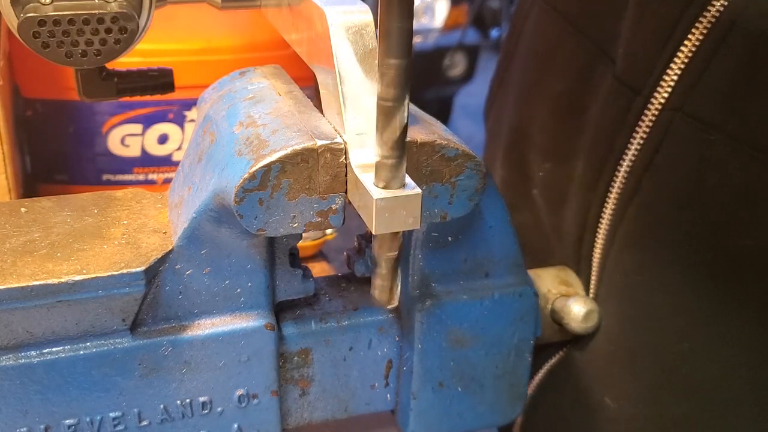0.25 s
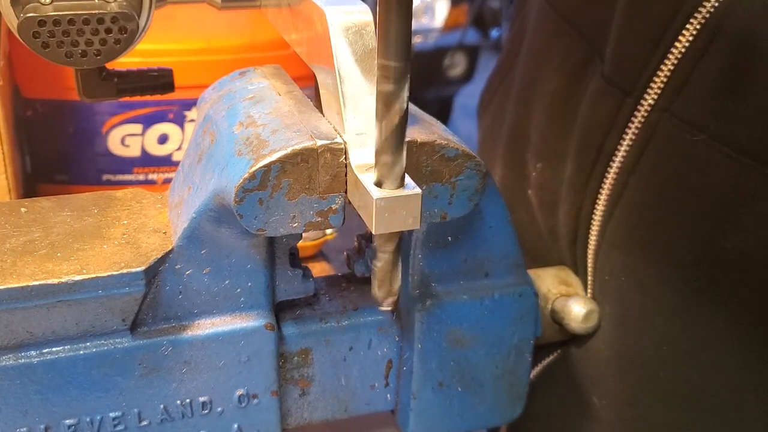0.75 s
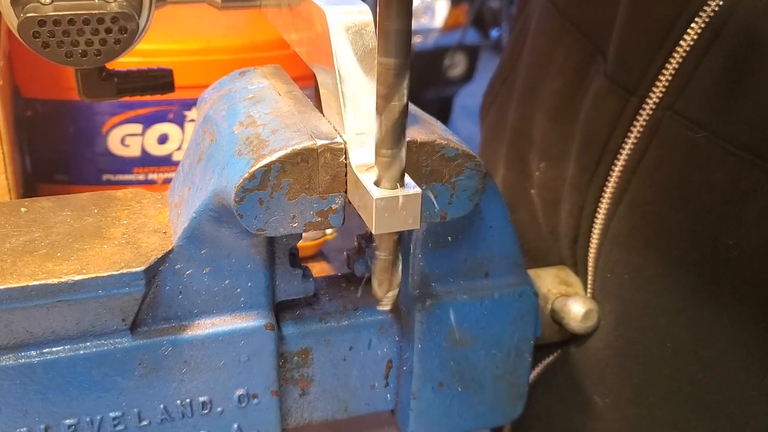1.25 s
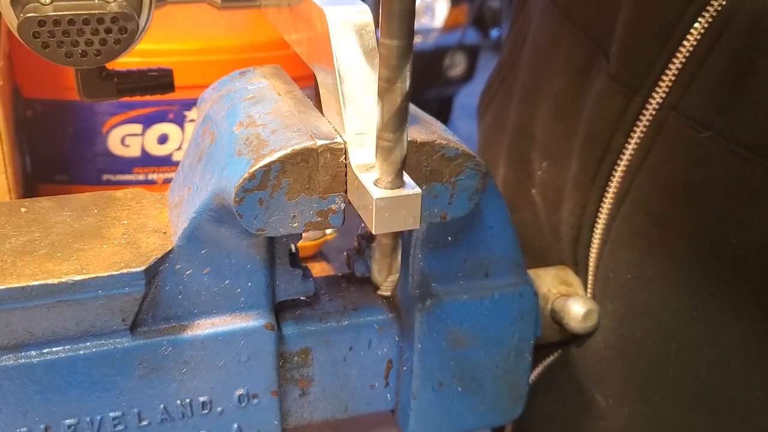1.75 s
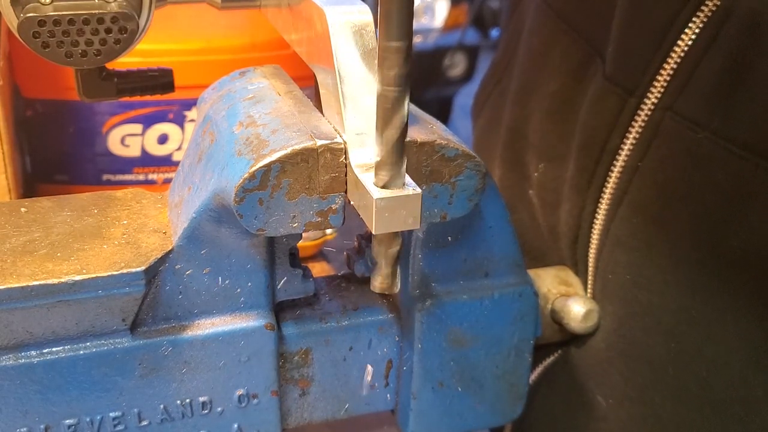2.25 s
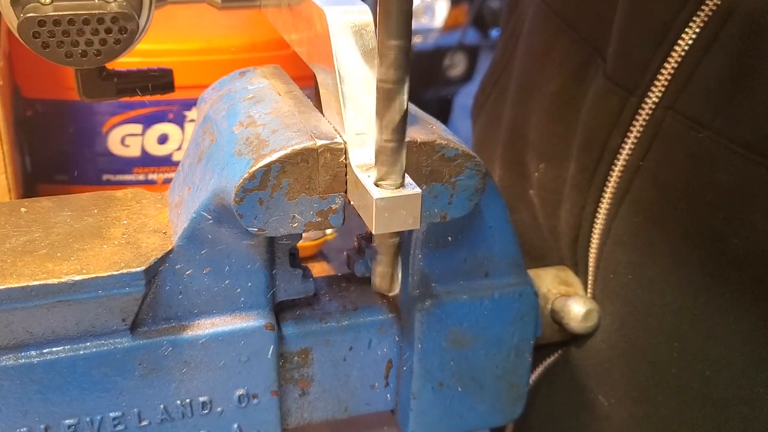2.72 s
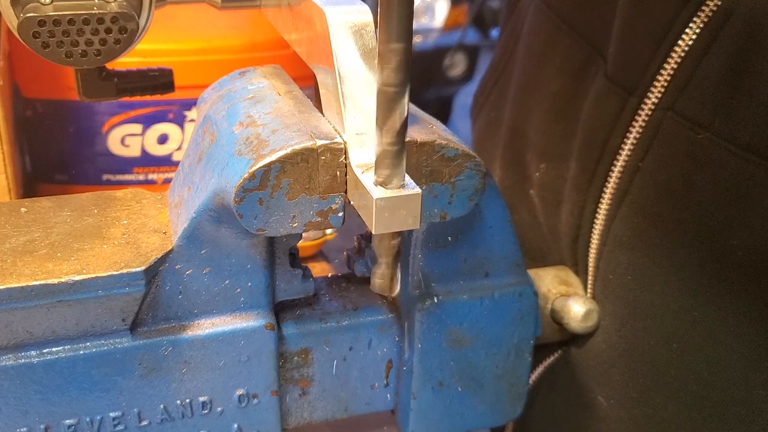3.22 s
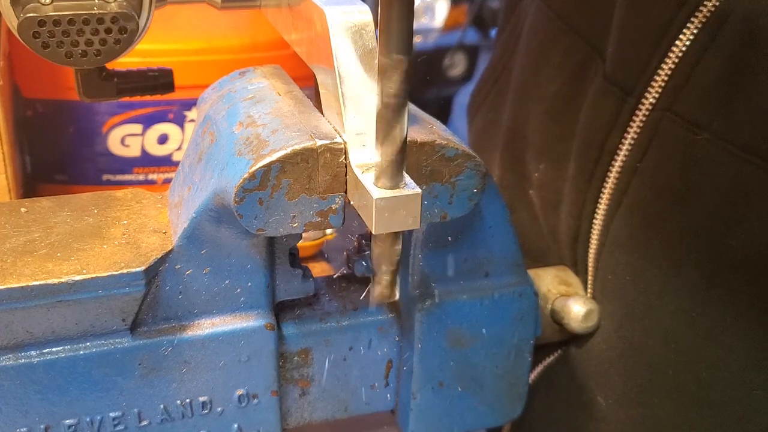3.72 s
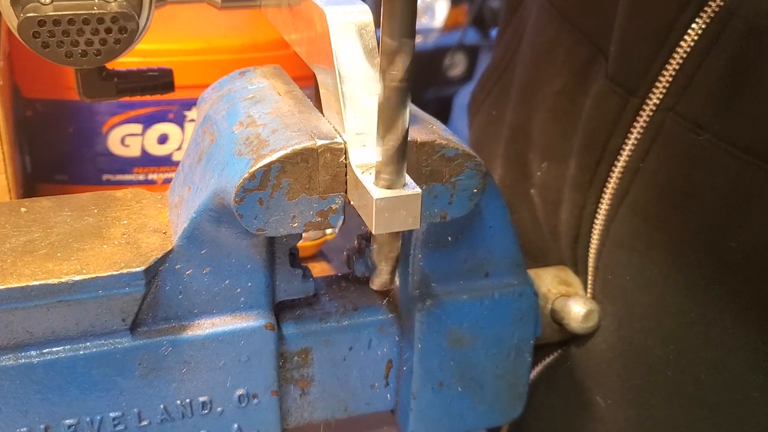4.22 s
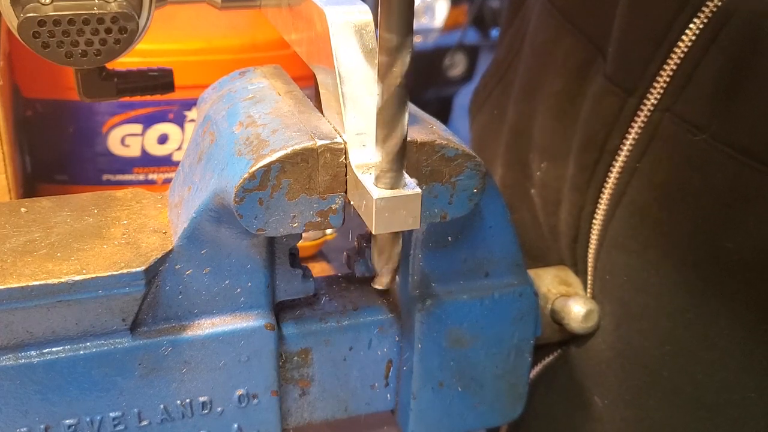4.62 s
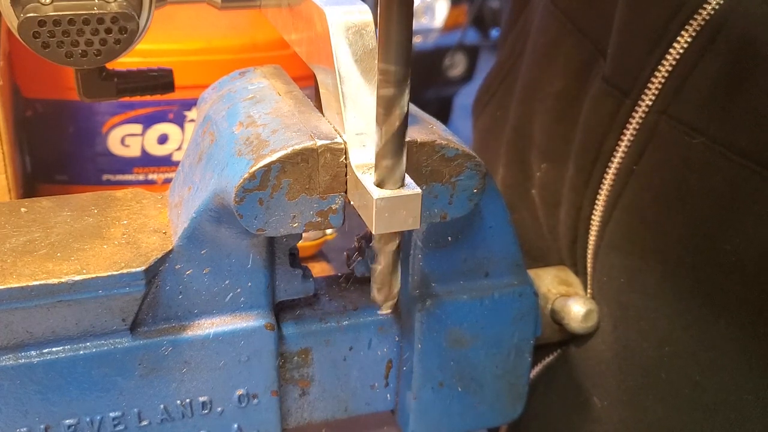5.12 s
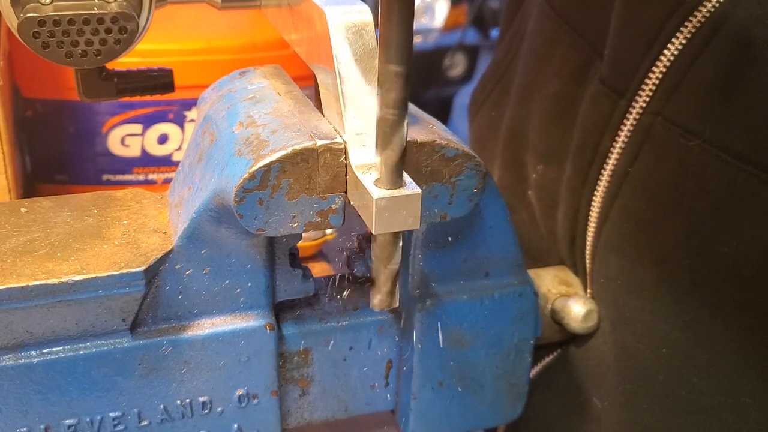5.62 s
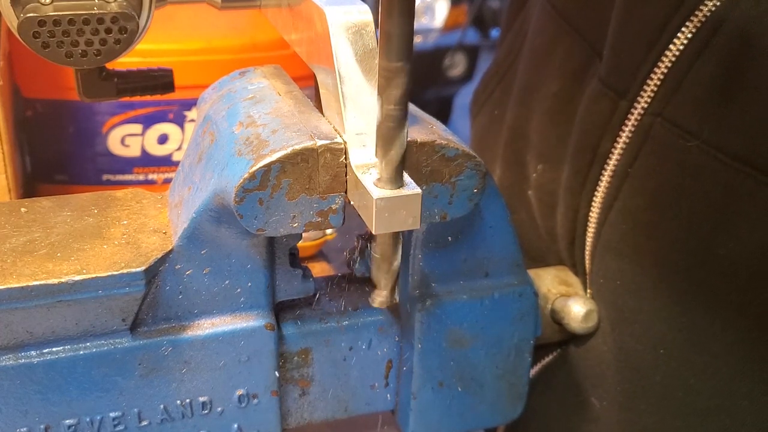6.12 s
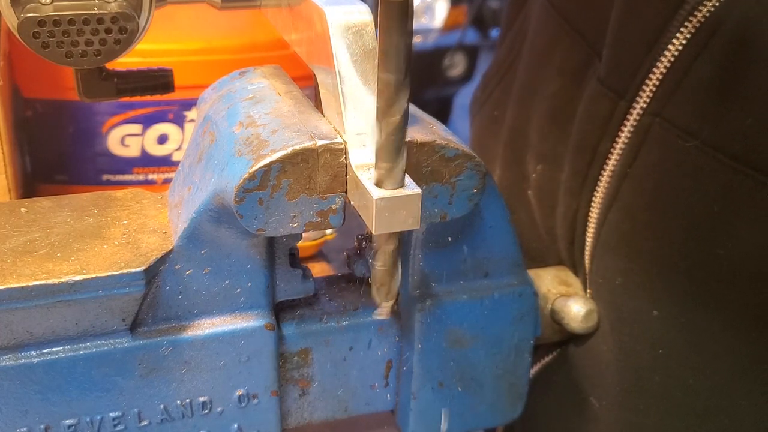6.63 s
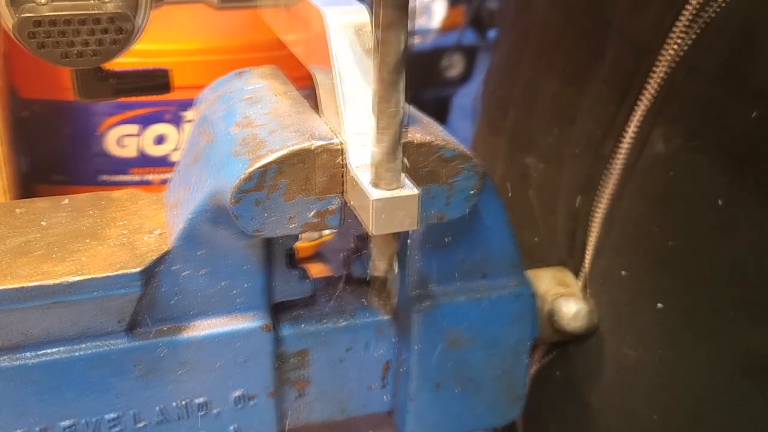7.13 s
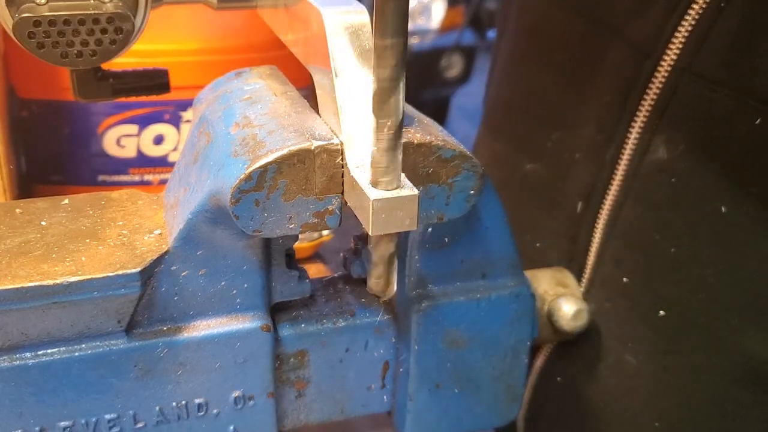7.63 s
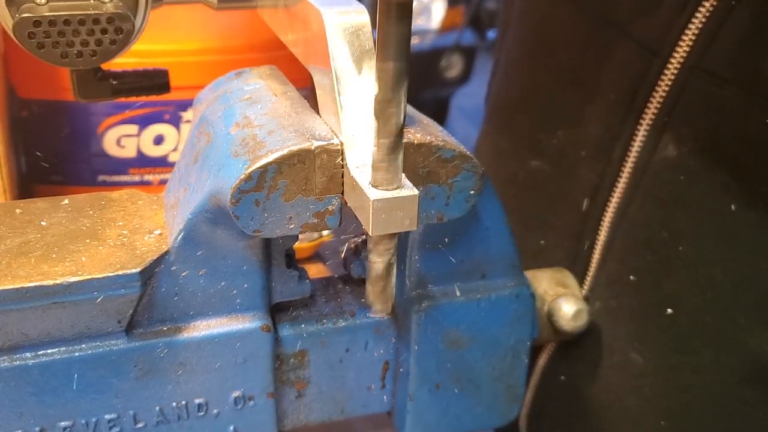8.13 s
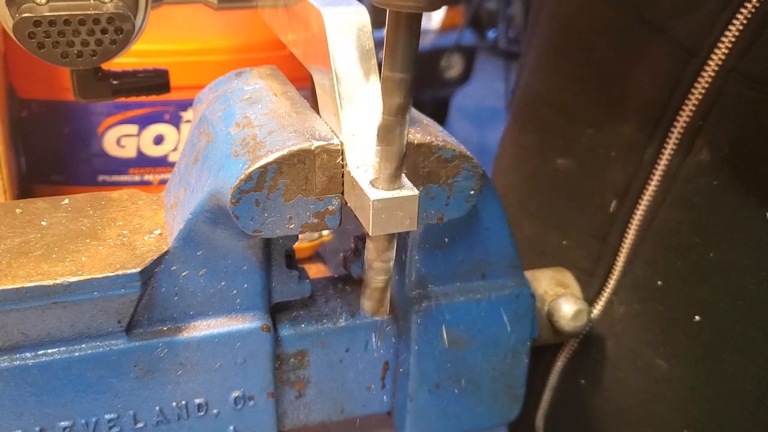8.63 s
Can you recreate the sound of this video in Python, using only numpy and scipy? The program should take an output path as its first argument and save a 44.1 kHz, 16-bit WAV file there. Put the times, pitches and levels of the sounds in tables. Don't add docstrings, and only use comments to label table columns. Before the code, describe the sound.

A power drill runs continuously, heard by a close stereo microphone pair with slight garage reflections. Its laboured whine dips as the bit grabs, with gritty hiss, bench thuds and short metallic judders. A piercing squeak makes the level drop, after which the motor spins faster and gradually regains loudness. More chatter and small squeaks follow before the tones give way to a cleaner, steady tooth whine over rumble.

```python
import sys
import numpy as np
from scipy import signal
from scipy.fft import irfft, next_fast_len
from scipy.io import wavfile
from scipy.ndimage import uniform_filter1d

SR = 44100
rng = np.random.default_rng(int(sys.argv[2]) if len(sys.argv) > 2 else 0)


def wav_out(sig):
    wavfile.write(sys.argv[1], SR, np.round(np.clip(np.atleast_2d(sig).T, -1, 1) * 32767).astype(np.int16))


def elevation(decibels):
    levels = np.asarray(decibels, float)
    return 10 ** (levels / 20)


N = 390726


def evened(x):
    return x / np.sqrt(np.mean(x ** 2) + 1e-20)


def read(hz, points, values):
    return np.interp(np.log(hz + 1), np.log(np.add(points, 1)), values)


def curve(rows, t):
    s, *columns = np.transpose(rows)
    return [np.interp(t, s, c) for c in columns]


def cusps(rows, t, point=1):
    s, reach, *columns = np.transpose(rows)
    return np.array(columns) @ np.exp(-(abs(t - s[:, None]) / reach[:, None]) ** point)


def slowly(rule):
    coarse = np.arange(0, N + 64, 64) / SR
    return lambda t: np.array([np.interp(t, coarse, row) for row in rule(coarse)])


def wander(size, count=N, db=None):
    knots = 1.205 * rng.standard_normal(count // size + 2)
    heights = knots if db is None else elevation(db * knots)
    return np.interp(np.arange(count) / size, np.arange(len(knots)), heights)


def sides(pan_db):
    return elevation(np.array([[.5], [-.5]]) * pan_db)


def tone(turns, lead, waver_db, blur):
    phase = 2 * np.pi * (turns + rng.random()) + blur * wander(size=900, count=len(turns))
    sines = np.sqrt(2) * np.sin([phase, phase - lead])
    return sines * wander(size=1800, count=len(turns), db=waver_db)


# f/Hz, likeness 0-1, left lead/rad, left minus right level/dB
PAIR_BANDS = [(60, 0.96, .2, 1.5), (200, 0.95, 0.23, 4), (400, 0.65, 0.17, -2), (780, 0.62, 0.29, 0.5),
              (1140, 1, 1.95, 5.5), (1360, 0.6, 0.59, 1.5), (1700, 0.82, 1.22, 0.5), (2370, 0.04, 1.8, 4.5),
              (2570, 0, 0.68, 4), (2970, 0.22, 1.2, 4), (3970, 0.2, 3.2, 1.5), (5060, 0.33, 1.14, 1),
              (7900, 0.03, .3, 2), (15000, 0.05, .3, 2)]


def paired(hz, left, other):
    points = np.transpose(PAIR_BANDS)[0]
    _, same, lead, pan_db = (read(hz, points, c)[:, None] for c in np.transpose(PAIR_BANDS))
    same = np.clip(same, 0, 1)
    right = same * left * np.exp(-1j * lead) + np.sqrt(1 - same ** 2) * other
    return np.array([left * elevation(pan_db / 2), right / elevation(pan_db / 2)])


# t/s, f/Hz
ROTOR_SPEED = [(0, 441.3), (.3, 442), (.65, 422.9), (1.44, 423), (1.47, 469), (2.7, 464.7), (3.3, 458.7),
               (5.7, 458.6), (7.33, 448.2)]
# t/s, reach/s, share of speed lost
ROTOR_SAGS = [(0.0, 0.034, 0.065), (.345, 0.031, .017), (.6, .04, .018), (.73, 0.045, 0.06),
              (.87, .035, .03), (.955, .015, .018), (1.19, .05, 0.053), (1.47, .09, .014),
              (1.95, 0.084, .012), (2.42, 0.097, .022), (3.17, 0.099, 0.016), (3.47, 0.098, .015),
              (4.11, .045, .026), (4.31, 0.044, 0.032), (4.42, .03, .015), (4.73, .04, 0.05),
              (4.85, 0.1003, 0.01004), (5.03, .03, .02), (5.26, 0.06, 0.034), (5.32, .02, .02),
              (5.425, 0.025, .05), (5.475, .045, .055), (6.1, 0.099, 0.025), (6.4, .1, .008),
              (6.58, 0.035, .028)]


def rotor_hz(t):
    return curve(ROTOR_SPEED, t)[0] * (1 - cusps(ROTOR_SAGS, t)[0])


# start t/s, end t/s
HANDOVER = (6.92, 7.38)
DUCK_S = 1.449


def stages(t, lead=0):
    late = np.interp(t + lead, HANDOVER, [0, 1])
    light = np.clip((rotor_hz(t) - 430) / 14, 0, 1) * (t > DUCK_S)
    return np.array([(1 - light) * (1 - late), light * (1 - late), late])


# t/s, level/dB
EFFORT = [(0, -34), (.23, -36.5), (.64, -33), (1.1, -33.5), (1.2, -30), (1.45, -30.5), (2.2, -31),
          (2.55, -30), (2.85, -28.5), (4.2, -30.5), (5.4, -30.5), (5.7, -31.5), (6.8, -30.5), (7.0, -28.5),
          (7.7, -29.5), (8.4, -31), (8.86, -29.5)]
# level/dB under heavy load, running light, in the slow stage
LAYERS = [(3.5, 3, -1.5), (-4.5, -5.5, -10.5), (1.3, 0, -2)]
# t/s, reach/s, housing ring level/dB, bench thud level/dB
GRABS = [(.03, 0.081, -2, 5.5), (1.05, 0.16, -2, -5), (1.21, .04, 2.5, 1.5), (1.35, 0.085, 1.5, 4),
         (2.04, 0.043, 5, 7), (4.17, .05, 2, 4), (5.4, 0.065, 3, 3.5), (6.1, 0.89, -1.5, 0),
         (7.71, 0.22, -2.5, 0.5), (8.15, 0.11, 1, 2.5), (8.55, 0.096, 4, -2.5), (8.8, 0.13, 0.5, 12)]


def loudness(t):
    air = curve(EFFORT, t)[0]
    ring, thud = cusps(GRABS, t)
    ease_s, gear_share = 0.39, 0.15
    return [air, *(air + np.array(LAYERS) @ stages(t, ease_s) + [ring, thud, gear_share * thud])]


def modes(table, hz, t):
    shapes = np.array([1 / (1 + ((hz - f) / w) ** 2) ** 2 for f, w, *_ in table])
    power = shapes.T @ elevation(2 * np.array(table)[:, 2:]) @ stages(t)
    return power / power.sum(0)


def peaks_db(table, hz):
    return sum(db / (1 + (2 * (hz - f) / w) ** 2) for f, w, db in table)


EDGE_HZ = 15880
# f/Hz, width/Hz, level/dB under heavy load, running light, in the slow stage
HOUSING = [(596, 143, -24, -25, -8.5), (680, 50, -6, -16, -8.5), (761, 54, -10, -5, -14),
           (1267, 31, 6.5, -2, 2), (1373, 117, 0, -4, -0.5), (1543, 200, -4, -4, -8),
           (1745, 220, -5, -7.5, -13), (2220, 210, -6.5, -10, -6.5)]
# f/Hz, width/Hz, level/dB (heavy, light, slow stage)
GEARBOX = [(2833, 190, 2, 0, -15), (3030, 140, -4, 1, -8), (3480, 500, 1, -1, -16),
           (3430, 67, -10, -16, -17), (3860, 1080, -6.5, -7.5, -1)]
# f/Hz, level/dB per Hz, change/dB once the slow stage runs
HISS = [(200, -55, 0), (293, -25.5, 9.5), (605, -18.5, -24), (765, -9.5, -1.5), (1150, -15, 3.5),
        (1410, -7.5, -2.5), (1930, -11.5, -3.5), (3130, -9.5, 2.5), (4100, -11, -1), (6180, -13.5, 2),
        (8300, -17.5, 6), (11200, -18.5, 3), (13500, -17, 4.5), (15500, -14.5, 1.5)]
# f/Hz, width/Hz, level/dB
AIR_PEAKS = [(4300, 150, 4), (4550, 200, 5.5), (4967, 93, 8), (5550, 130, 6.5), (6070, 230, 7),
             (7400, 360, 3.5), (7770, 280, 3.5), (9370, 120, 6), (10200, 400, 3.5), (10500, 100, 4)]
# f/Hz, width/Hz, level/dB
LATE_PEAKS = [(6900, 160, 4), (7330, 100, 3), (7900, 100, 0.5), (8300, 110, 3), (8800, 130, 4)]


def cutting():
    frames, hz = N // 256 + 5, np.fft.rfftfreq(1024, 1 / SR)
    t = np.arange(frames) * 256 / SR
    air, body, _, gear = loudness(t)
    f, hiss_db, change_db = np.transpose(HISS)
    bumps, late = peaks_db(AIR_PEAKS, hz), peaks_db(LATE_PEAKS, hz)
    hiss = elevation(2 * (read(hz, f, hiss_db) + bumps)) * (hz < EDGE_HZ)
    hiss /= hiss[(hz > 4000) & (hz < 8500)].sum()
    late_change_db = read(hz, f, change_db) - 0.67 * bumps + late
    power = modes(HOUSING, hz, t) * elevation(2 * (body + 1.0))
    power += modes(GEARBOX, hz, t) * elevation(2 * (gear + 4.0))
    power += hiss[:, None] * elevation(2 * (air + 3.0 + np.outer(late_change_db, stages(t)[2])))

    a, b, c, d, patches = rng.standard_normal((frames, 513, 5)).T
    flutter = evened(uniform_filter1d(patches[0], size=3))
    patches = uniform_filter1d(uniform_filter1d(patches, size=10, axis=0), size=9, axis=1)
    uneven = elevation(0.66 * evened(patches) + 0.5 * flutter)
    spectra = paired(hz, a + 1j * b, c + 1j * d) * np.sqrt(power) * uneven
    return 0.87 * signal.istft(spectra, nperseg=1024, noverlap=768)[1][:, :N]


# f/Hz, level/dB per Hz
RUMBLE = [(20, -47), (32, -25), (42, -18), (56, 5.5), (72, -3), (92, 1), (115, -6), (138, -29.5),
          (190, -21), (270, -16.5), (340, -24.5), (450, -26.5), (600, -40)]
# f/Hz, change/dB
RUMBLE_LATE = [(30, -4), (56, -5), (80, 1), (110, 3), (160, 0)]
# f/Hz, width/Hz
PANEL = (162.8, 15)


def bench():
    size = next_fast_len(N, True)
    hz, t = np.fft.rfftfreq(size, 1 / SR)[:6000], np.arange(N) / SR
    a, b, c, d = rng.standard_normal((4, len(hz), 1))
    shake = paired(hz, a + 1j * b, c + 1j * d)[..., 0]

    def shaken(gain):
        return evened(irfft(shake * gain, size)[:, :N])

    early_db = read(hz, *np.transpose(RUMBLE))
    early = shaken(elevation(early_db))
    late = shaken(elevation(early_db + read(hz, *np.transpose(RUMBLE_LATE))))
    rumble = early + (late - early) * np.interp(t, HANDOVER, [0, 1])
    hum = shaken(1 / (1 + ((hz - PANEL[0]) / PANEL[1]) ** 2))
    air, _, rumble_db, _ = slowly(loudness)(t)
    hum_db = air - 21.5 + np.interp(t, [7.95, 8.3], [0, 9.8])
    return rumble * elevation(rumble_db) * wander(size=5000, db=1.0) + hum * elevation(hum_db)


# multiple of rotor speed, then level/dB and
# left minus right level/dB under heavy load, and the same two running light
ROTOR_TONES = [(1.0, -34, -11, -32.5, -4), (1.25, -34, 8, -29, 1), (1.64, -23.5, 0, -18.5, 11),
               (1.74, -20.5, 9, -17, 10.5), (2.0, -20, -1, -21.5, 11), (2.75, -32, 2, -21, 5),
               (3.0, -11, -2, -6.5, -2.5), (3.16, -12.5, -6, -17, 1), (3.21, -14, 6, -9.5, 2),
               (3.38, -15, -6, -12, 1), (3.59, -13, 0, -17.5, 8), (4.0, -8.5, 12.5, -16.5, 7),
               (5.02, -20.5, -2, -19, -1), (5.12, -14.5, 8, -18, -2), (6.56, -24, 11, -17.5, 11),
               (7.0, -7.5, 6, -15.5, 4), (8.0, -16, 3, -19, -14), (8.4, -14, 3, -19.5, -3),
               (9.98, -20, -5.5, -20.5, -16)]
# f/Hz, width/Hz, level/dB
SHELLS = [(3280, 38, 8), (3000, 55, 7), (3370, 50, 5), (1272, 32, 9)]
# t/s, reach/s, level/dB
TONE_SWELLS = [(.2, 0.13, 2), (.45, .14, 1), (.65, .06, 0.5), (1.03, 0.13, 3), (1.72, 0.16, 1.5),
               (2.08, 0.098, -7.5), (2.26, .05, 1), (2.4, .05, 0), (2.9, 0.14, 0.5), (3.9, .15, 1),
               (5.65, .12, 0.5), (6.22, .08, 2), (6.85, .2, -2)]
# start t/s, end t/s, level/dB
BIND = (1.16, 1.46, -13)


def motor():
    t = np.arange(int(HANDOVER[1] * SR)) / SR

    def load(c):
        choke_db = -55 * cusps(ROTOR_SAGS, c)[0]
        body = loudness(c)[1] + choke_db + cusps(TONE_SWELLS, c, point=2)[0]
        return [*stages(c), rotor_hz(c), body]

    heavy, light, _, hz, body = slowly(load)(t)
    unsteady = .0012 * wander(size=3000, count=len(t))
    unsteady += (.003 + .001 * heavy) * wander(size=900, count=len(t))
    turns = np.cumsum(hz * (1 + unsteady)) / SR
    out = np.zeros((2, N))
    for k, heavy_db, heavy_pan, light_db, light_pan in ROTOR_TONES:
        def shell_db(c):
            return [sum(db / (1 + ((k * rotor_hz(c) - f) / w) ** 2) for f, w, db in SHELLS)]

        gain = heavy * elevation(heavy_db) * sides(heavy_pan) + light * elevation(light_db) * sides(light_pan)
        gain *= elevation(slowly(shell_db)(t)[0])
        out[:, :len(t)] += gain * tone(k * turns, lead=.8, waver_db=1.3, blur=.3)
    bound = np.clip((t - BIND[0]) / 0.063, 0, 1) * (t < BIND[1])
    out[:, :len(t)] *= elevation(body + BIND[2] * bound + .5)
    return out


def shaken_metal(rows):
    out = np.zeros((2, N))
    for s, length, hz, width, db in rows:
        t = np.arange(int(length * SR)) / SR
        poles = [np.exp(-1.5 * np.pi * width / SR)] * 2
        shake = signal.lfilter([1], np.poly(poles), rng.standard_normal((2, SR)))[:, :len(t)]
        ring = evened(shake[0] * np.cos(2 * np.pi * hz * t) + shake[1] * np.sin(2 * np.pi * hz * t))
        ring = ring * wander(size=220, count=len(t), db=2.5) * signal.windows.tukey(len(t), .4)
        out[:, int(s * SR):][:, :len(t)] += elevation(db) * sides(4.5) * ring
    return out


# t/s, length/s, f/Hz, width/Hz, level/dB
MORE_JUDDERS = [(5.783, 0.016, 4450, 250, -33), (5.2, 0.013, 5700, 134, -34), (5.785, 0.011, 8800, 500, -27.5),
                (5.784, 0.008, 12500, 5200, -25.5), (5.8, 0.0058, 6040, 4000, -28.5),
                (6.915, 0.01, 9100, 2500, -32), (0, .14, 150, 25, -45), (.7, .035, 1820, 60, -36),
                (1.38, .07, 200, 30, -48), (3.19, .04, 2720, 80, -41), (1.24, .06, 740, 40, -37),
                (5.015, .02, 3400, 250, -35)]


def more_judders():
    return shaken_metal(MORE_JUDDERS)


# t/s, length/s, f/Hz, width/Hz, level/dB
JUDDERS = [(1.165, 0.08, 1280, 11, -30), (.58, 0.44, 1280, 43, -34), (2.09, 0.059, 3100, 200, -48),
           (2.01, 0.045, 2780, 120, -46), (.55, 0.69, 690, 30, -45), (1.26, 0.056, 720, 63, -38),
           (1.35, 0.1023, 1550, 130, -33.5), (1.18, 0.033, 2750, 100, -31.5), (1.4, .04, 3600, 80, -35),
           (1.22, .1, 2950, 250, -33), (1.33, .04, 3370, 79, -31), (1.3, 0.032, 3610, 230, -29.5),
           (1.327, 0.024, 2950, 270, -26), (1.3, 0.033, 1270, 90, -29), (1.2, 0.278, 757, 89, -40),
           (5.4, 0.13, 680, 51, -40), (2.005, 0.05, 2920, 140, -42.5), (1.4612, .0055, 2500, 5900, -38),
           (3.48, 0.042, 2950, 150, -36), (2.6, 0.16, 2950, 380, -48), (4.15, .08, 2920, 250, -30.5),
           (4.28, 0.054, 2950, 230, -32.5), (8.15, .06, 630, 60, -40.5), (8.58, .05, 620, 60, -41),
           (8.66, 0.049, 640, 72, -41), (5.34, 0.096, 2000, 330, -36.5), (7.08, .08, 2950, 200, -34.5),
           (4.7, .06, 2845, 200, -32), (5.18, 0.4, 2900, 260, -32), (5.3, 0.2, 3400, 110, -33),
           (5.368, 0.023, 1970, 80, -29.5), (2.455, 0.048, 2900, 200, -44), (6.0, 0.11, 3000, 183, -34.5),
           (7, 0.09, 2980, 180, -40), (2.365, 0.053, 2850, 200, -43), (5.452, 0.03, 1270, 60, -29.5)]


def judders():
    return shaken_metal(JUDDERS)


# t/s, length/s, first f/Hz, level/dB, left minus right level/dB
SQUEAKS = [(0.993, 0.0087, 10300, -25, 12), (1.1997, .005, 15100, -27, 1), (1.31, .005, 13000, -26, -5),
           (1.456, 0.0045, 9780, -12.5, 11), (1.4585, 0.01, 10050, -12.5, 12),
           (2.008, 0.01, 15480, -10, 1.5), (2.1145, 0.0086, 15500, -2.5, 5), (2.12, .006, 15450, -16, 9),
           (5.7837, 0.0057, 1484, -17, 5), (5.787, 0.0096, 1900, -18.5, 11), (5.792, 0.01, 2130, -16.5, 7),
           (5.914, 0.0048, 10200, -27, 1), (6.333, 0.0056, 9500, -27, -1.5), (6.681, 0.011, 1560, -23, -6),
           (6.691, 0.0047, 9350, -14.5, 9), (6.694, 0.005, 9850, -17, 5), (6.916, 0.0072, 1630, -16.5, 5),
           (6.919, 0.016, 1888, -23, 11), (6.92, .008, 7400, -30, 8)]
# f/Hz, share of pitch
GLIDE = [(1400, 0.12), (10000, 0.05), (15400, -0.025)]


def squeaks():
    out = np.zeros((2, N))
    for s, length, first_hz, db, pan in SQUEAKS:
        u = np.linspace(0, 1, int(length * SR))
        hz = first_hz * (1 + read(first_hz, *np.transpose(GLIDE)) * u)
        phase = 2 * np.pi * np.cumsum(hz) / SR
        grip = 1 + 0.2 * np.sin(2 * np.pi * (250 * length * u + rng.random((2, 1))))
        envelope = signal.windows.tukey(len(u), .7) * elevation(2.5 - 5.3 * u)
        out[:, int(s * SR):][:, :len(u)] += elevation(db - 0.5) * sides(pan) * np.sin(phase) * grip * envelope
    return out


def duck():
    fall_s, hold_s, recover_s, settle_s = 0.0084, 1.125, 1.89, 0.035
    since = np.arange(N) / SR - DUCK_S
    held_db = -14 * np.clip(1 - (since - hold_s) / recover_s, 0, 1) ** 1.39
    overshoot_db = -15 * np.exp(-abs(since / settle_s) ** 2)
    return elevation(np.clip(since / fall_s, 0, 1) * (held_db + overshoot_db))


# t/s, time to sink/s, time to recover/s, share of speed lost
STAGE_SAGS = [
    (6.84, 0.081, 0.07, .058),
    (7.26, 0.072, .11, 0.033),
    (7.69, .03, 0.046, .029),
    (7.77, 0.061, 0.085, .037),
    (8.07, .2, .1, 0.0061),
    (8.19, 0.061, 0.07, 0.014),
    (8.78, 0.085, 0.28, 0.046),
    (8.757, 0.0041, .006, 0.022),
    (8.81, 0.003, 0.016, 0.045),
]
# t/s, level/dB, left minus right level/dB, left lead/rad
WHINE = [(6.5, -55, 3, 2.3), (6.66, -36, 4, 2.3), (6.8, -30, 6.5, 2.74), (6.94, -28.5, 5.5, 2.7),
         (7.02, -26.5, 2, 2.1), (7.14, -26.5, 4.5, 2.5), (7.31, -24, 6, 3.05), (7.43, -23.5, 3.5, 2.3),
         (7.55, -23.5, 3.5, 2.06), (7.67, -24.5, 7, 2.8), (7.84, -24.5, 6, 2.65), (7.94, -22.5, 3, 1.86),
         (8.04, -23, 2.5, 1.85), (8.2, -24, 7, 2.2), (8.3, -23.5, 1.5, 2.3), (8.55, -23.5, 0.5, 2.6),
         (8.7, -23.5, 4, 2.18), (8.86, -24.5, 7.5, 2.2)]
# multiple of shaft speed, level/dB, left minus right level/dB
STAGE_TONES = [(1.0, -52.5, 0), (4.0, -44.5, -5.5), (5.0, -48, -6), (6.98, -38.5, -3), (8.0, -51, -13),
               (12.0, -52, 9), (13.51, -43.5, -2.5), (14.0, -40.5, -4), (17.0, -55, 4), (20.0, -44, 12)]


def slow_stage():
    t = np.arange(int(WHINE[0][0] * SR), N) / SR
    sag = sum(share * np.exp(-(abs(t - s) / np.where(t < s, sink, recover)) ** 1.4)
              for s, sink, recover, share in STAGE_SAGS)
    hz = (212.5 + 1.65 * (t - t[0])) * (1 - sag)
    whine_db, pan_db, lead = curve(WHINE, t)
    wobble = (0.0015 + 0.007 * np.clip((213 - hz) / 8, 0, 1)) * wander(size=500, count=len(t))
    turns = np.cumsum(uniform_filter1d(hz, size=400) * (1 + wobble)) / SR

    whine = elevation(whine_db - 15 * sag + 6.5) * sides(pan_db) * tone(16 * turns, lead, 0.23, 0.39)
    whine *= np.clip((t - t[0]) / .15, 0, 1)
    whine *= wander(size=70, count=len(t), db=1.0) * wander(size=25, count=len(t), db=1.06)
    rest = sum(elevation(db) * sides(pan) * tone(k * turns, 0.84, 2.24, 0.044 * k) for k, db, pan in STAGE_TONES)
    whole = whine + rest * np.interp(t, HANDOVER, [0, 1])
    return np.pad(whole, ((0, 0), (N - len(t), 0)))


def garage(x):
    wall_t60_s, top_t60_s, top_hz, wall_db = 0.28, 0.14, 12500, -14
    taps, t = np.zeros((2, 12000)), np.arange(12000) / SR
    at = np.arange(300, 11980, 20) + rng.integers(0, 20, (2, 584))
    np.put_along_axis(taps, at, rng.choice([-1., 1.], at.shape), 1)
    low = signal.oaconvolve(taps, signal.firwin(101, top_hz, fs=SR)[None], "same")
    taps = low * elevation(-60 * t / wall_t60_s) + (taps - low) * elevation(-60 * t / top_t60_s)
    taps /= np.linalg.norm(taps[0])
    return elevation(wall_db) * signal.fftconvolve(x.mean(0)[None], taps, axes=1)[:, :N]


def scene():
    sharp = more_judders() + judders() + squeaks() + slow_stage()
    return duck() * (cutting() + bench() + motor()) + sharp + garage(sharp)


def top_cut(x):
    return signal.sosfilt(signal.butter(12, 17080, fs=SR, output="sos"), x)


def record(dry):
    edge = signal.firwin(511, EDGE_HZ + 100, window=("kaiser", 8), fs=SR)
    mix = np.clip(signal.oaconvolve(dry, edge[None], "same"), -1, 1)
    return top_cut(mix)


dry = scene()
out = record(dry)
wav_out(out)
```